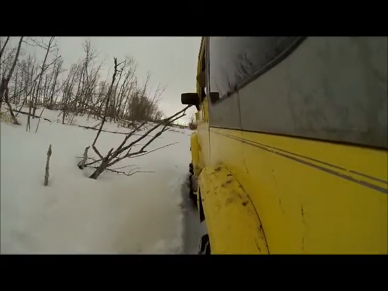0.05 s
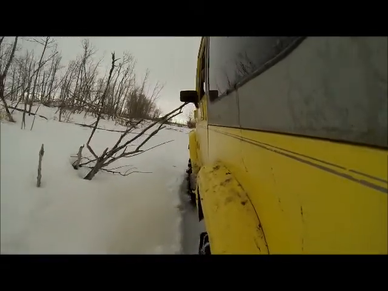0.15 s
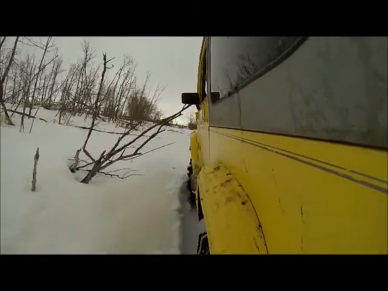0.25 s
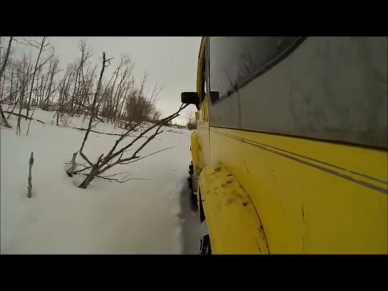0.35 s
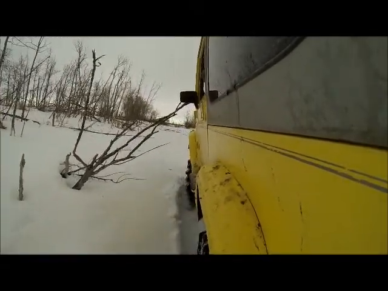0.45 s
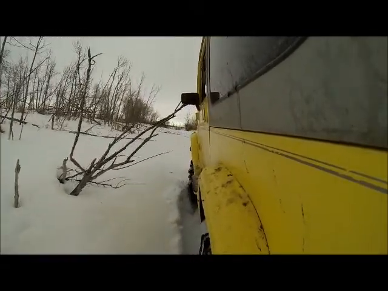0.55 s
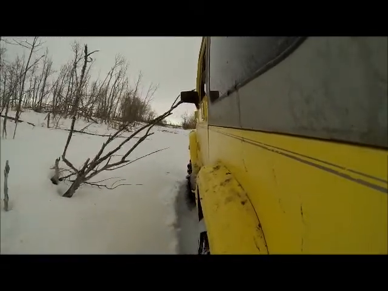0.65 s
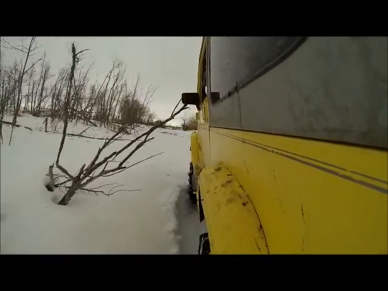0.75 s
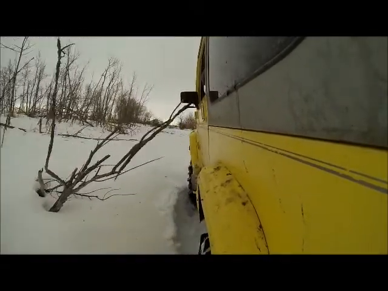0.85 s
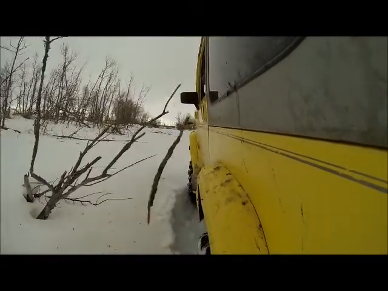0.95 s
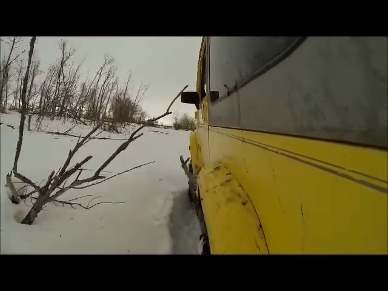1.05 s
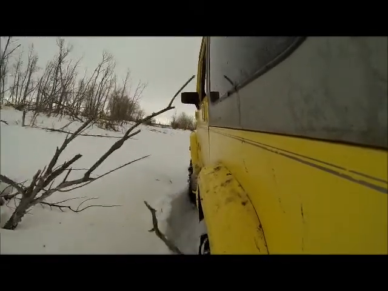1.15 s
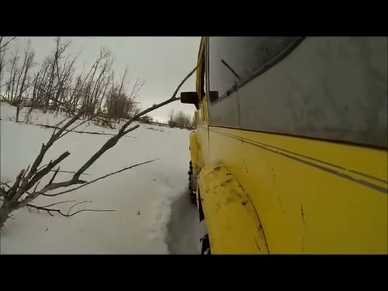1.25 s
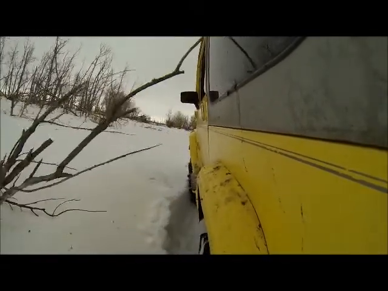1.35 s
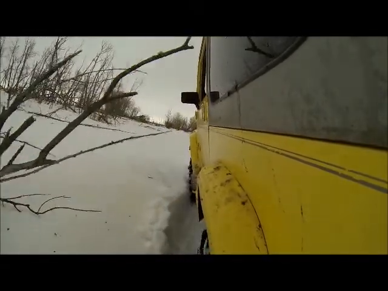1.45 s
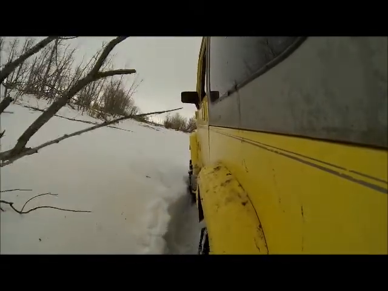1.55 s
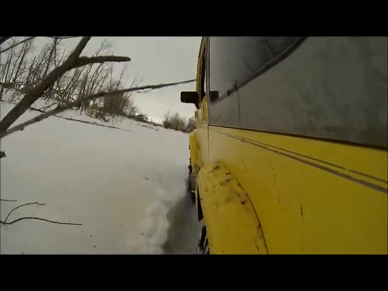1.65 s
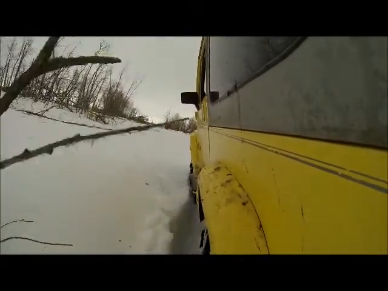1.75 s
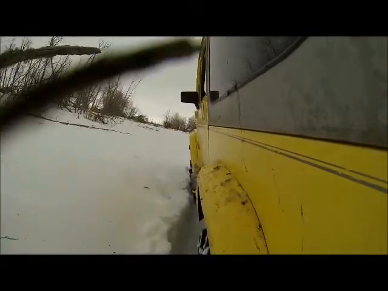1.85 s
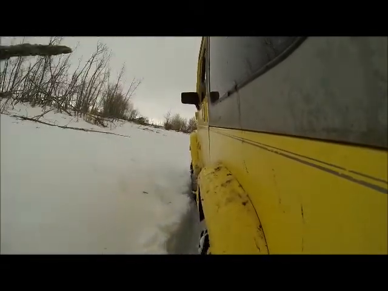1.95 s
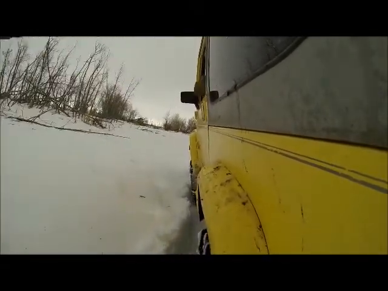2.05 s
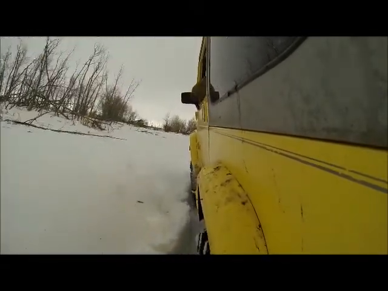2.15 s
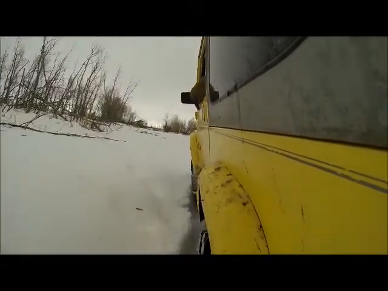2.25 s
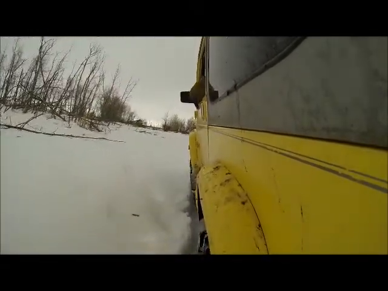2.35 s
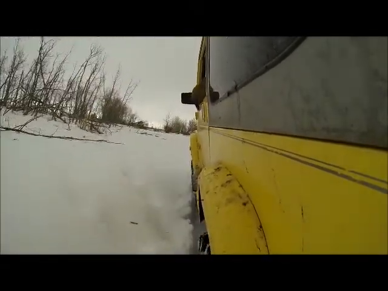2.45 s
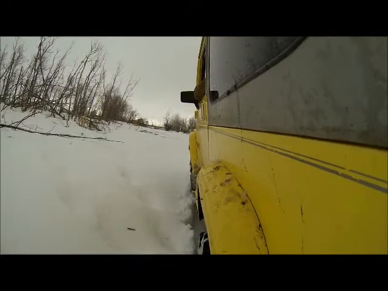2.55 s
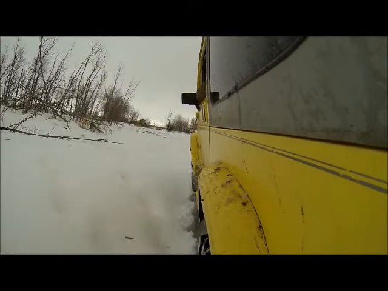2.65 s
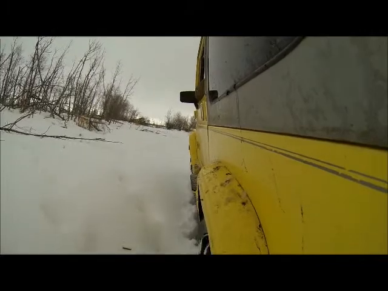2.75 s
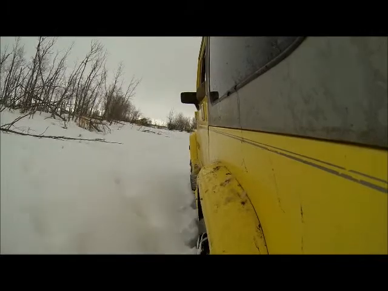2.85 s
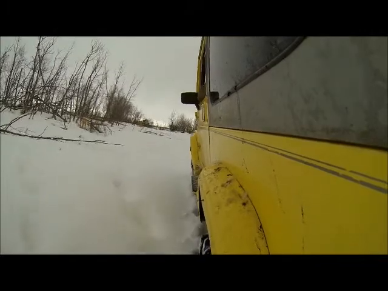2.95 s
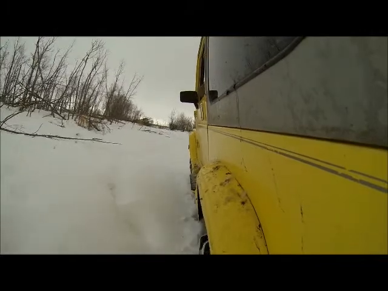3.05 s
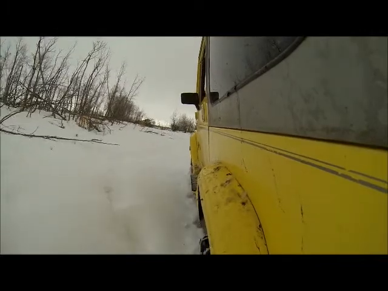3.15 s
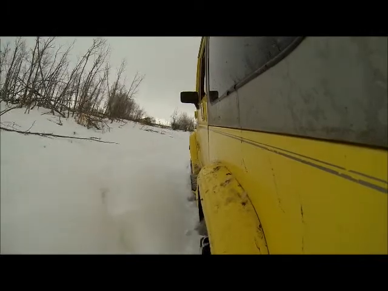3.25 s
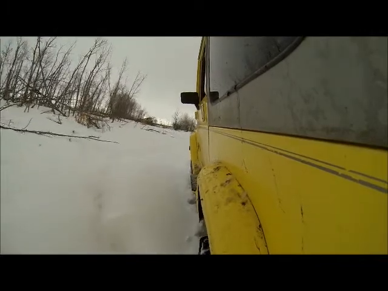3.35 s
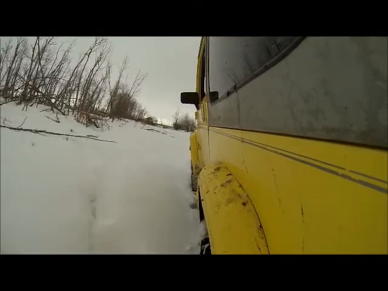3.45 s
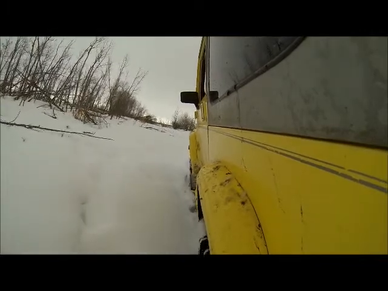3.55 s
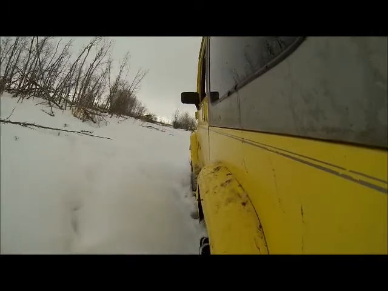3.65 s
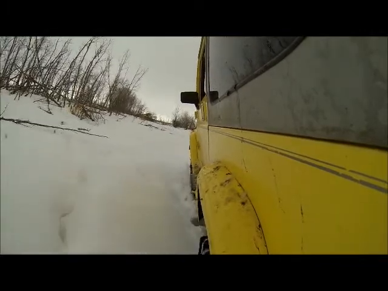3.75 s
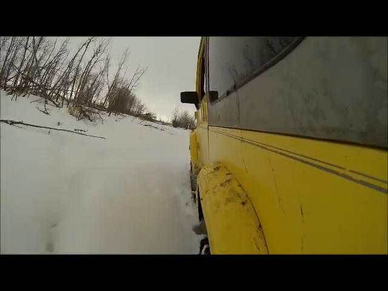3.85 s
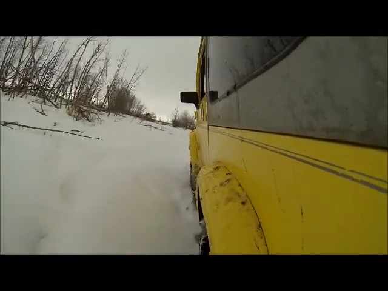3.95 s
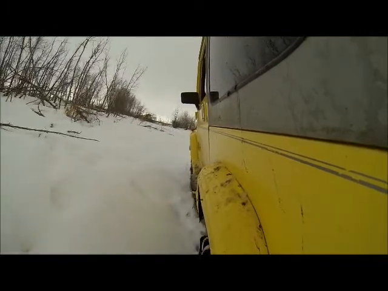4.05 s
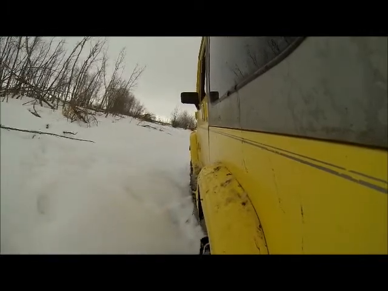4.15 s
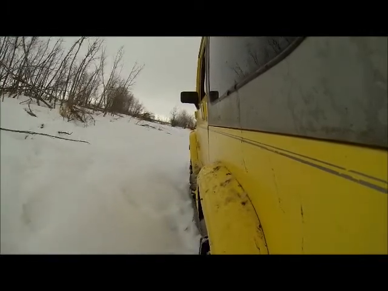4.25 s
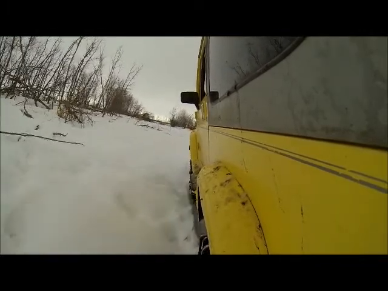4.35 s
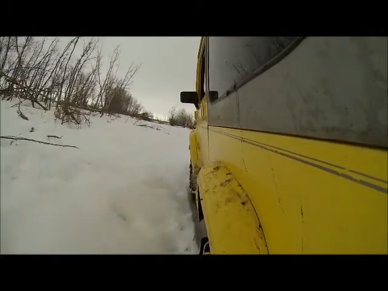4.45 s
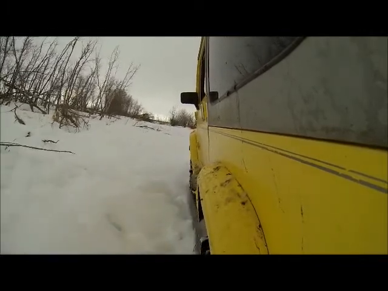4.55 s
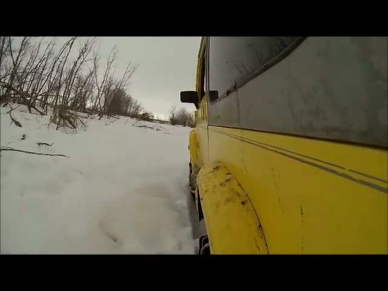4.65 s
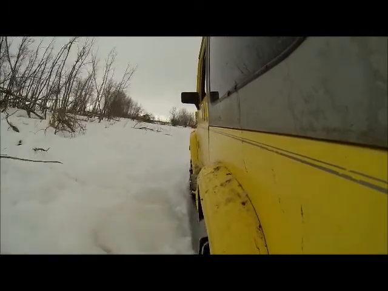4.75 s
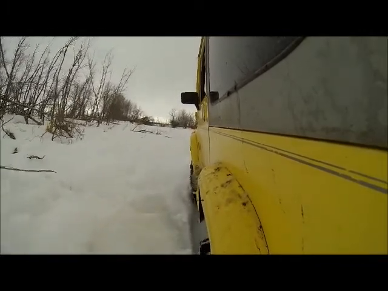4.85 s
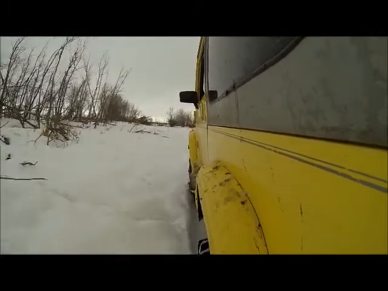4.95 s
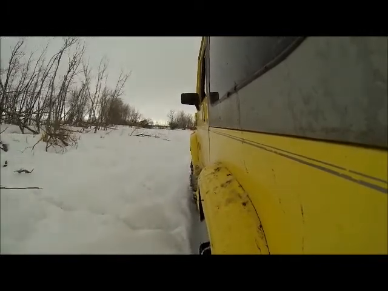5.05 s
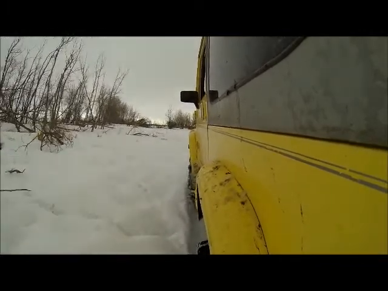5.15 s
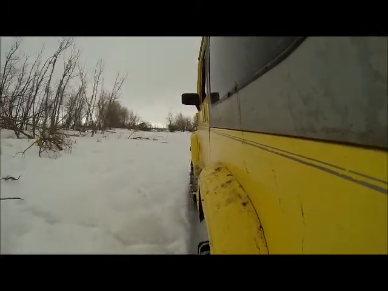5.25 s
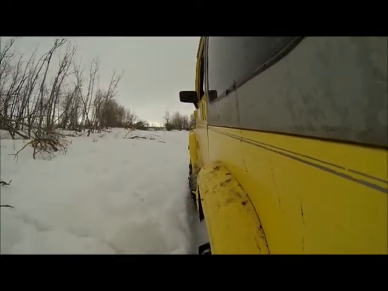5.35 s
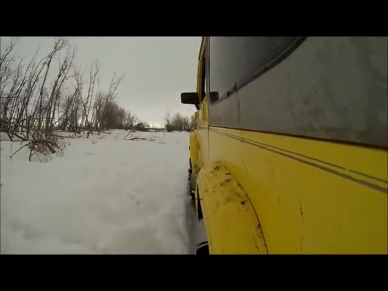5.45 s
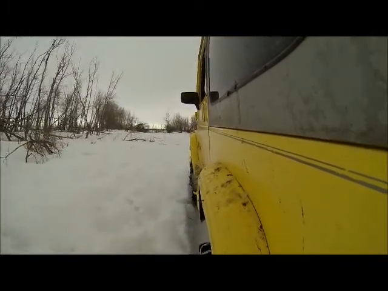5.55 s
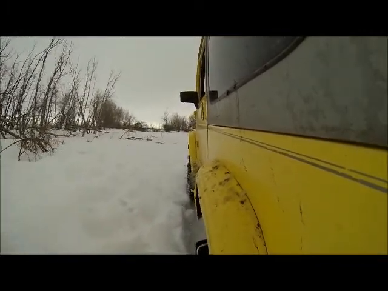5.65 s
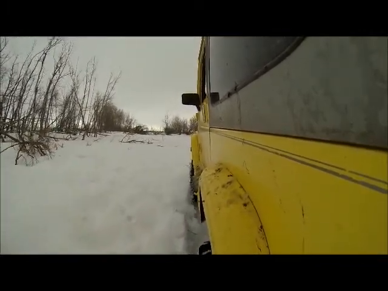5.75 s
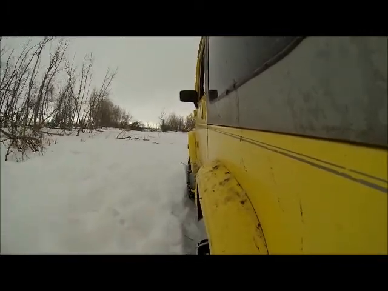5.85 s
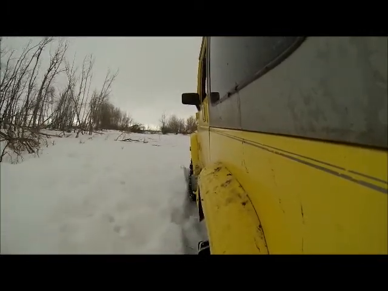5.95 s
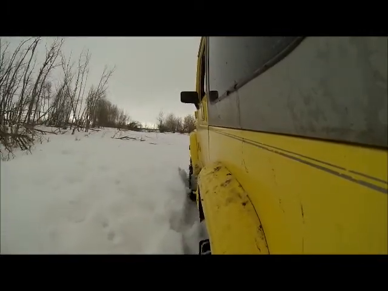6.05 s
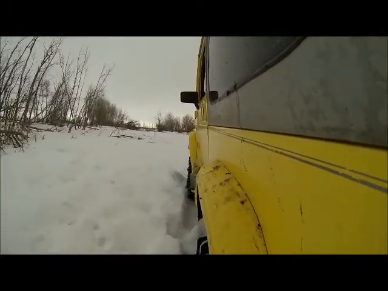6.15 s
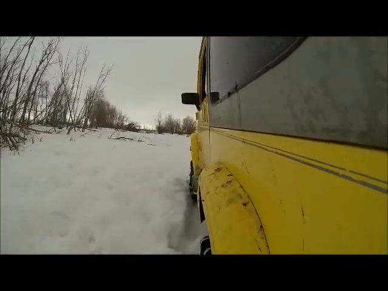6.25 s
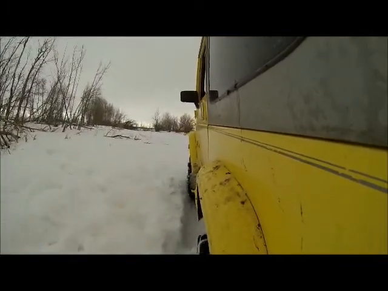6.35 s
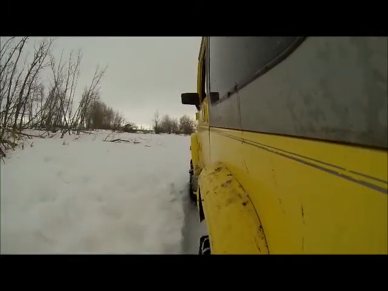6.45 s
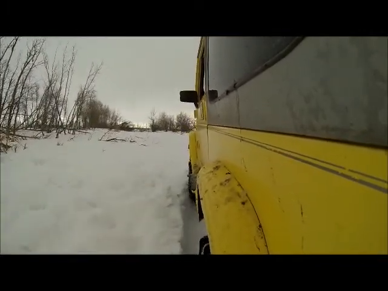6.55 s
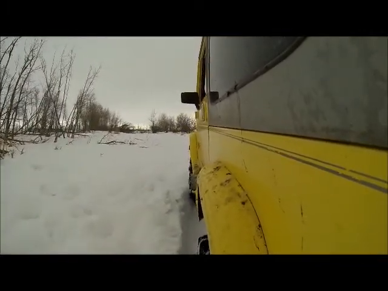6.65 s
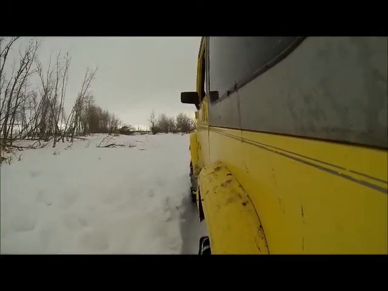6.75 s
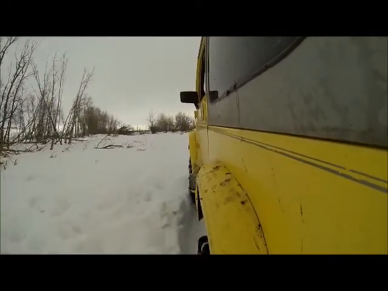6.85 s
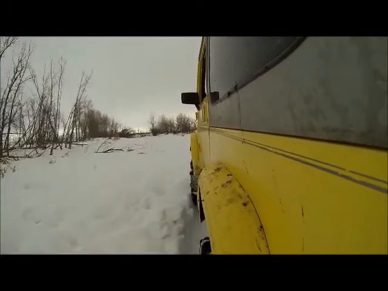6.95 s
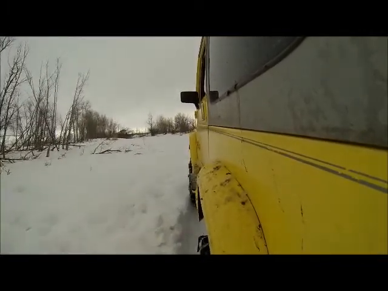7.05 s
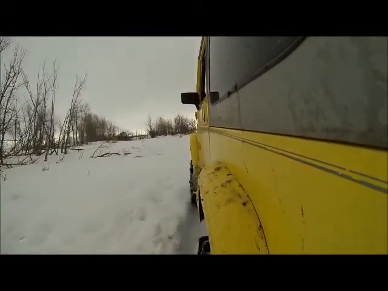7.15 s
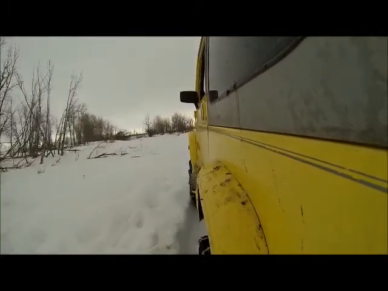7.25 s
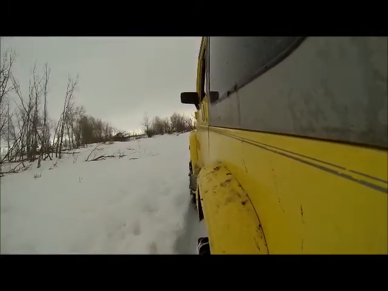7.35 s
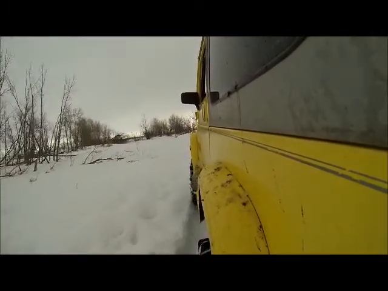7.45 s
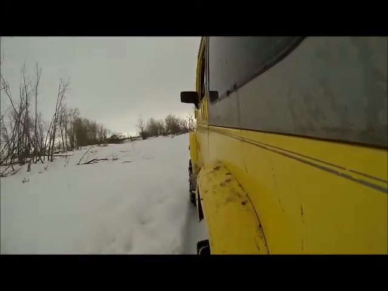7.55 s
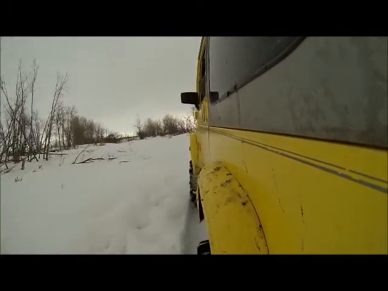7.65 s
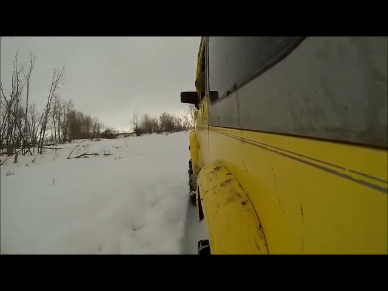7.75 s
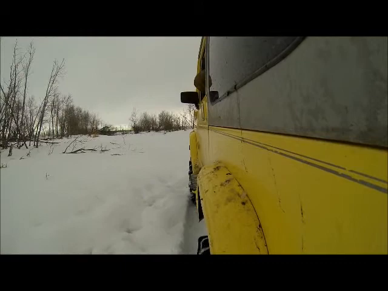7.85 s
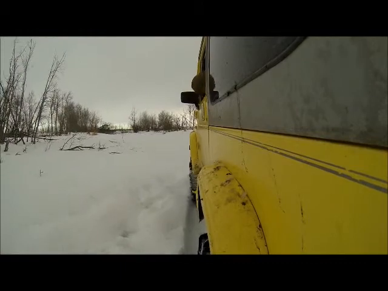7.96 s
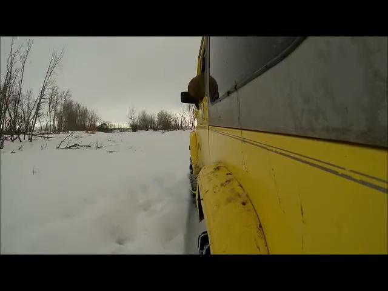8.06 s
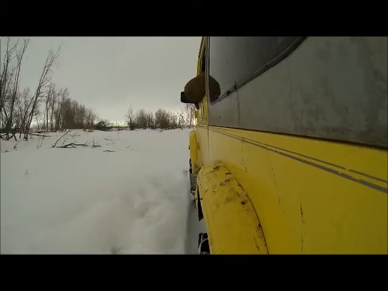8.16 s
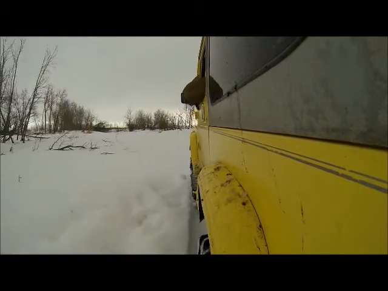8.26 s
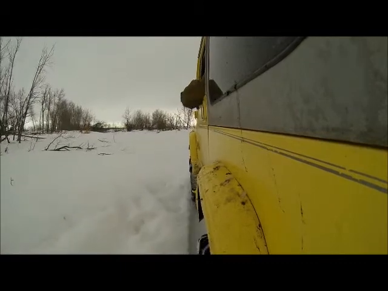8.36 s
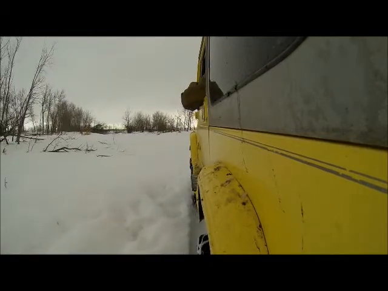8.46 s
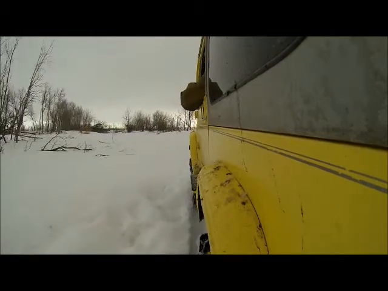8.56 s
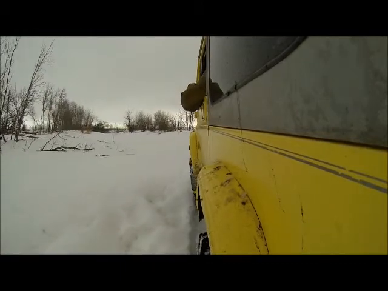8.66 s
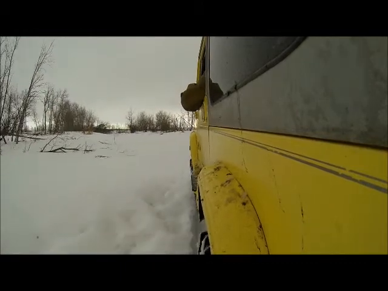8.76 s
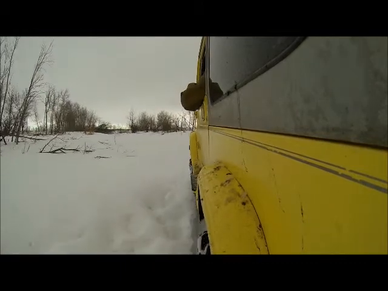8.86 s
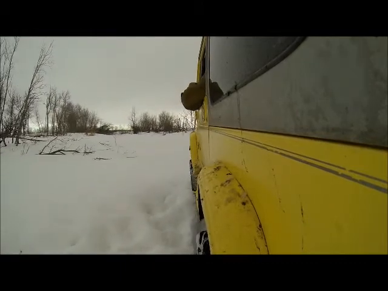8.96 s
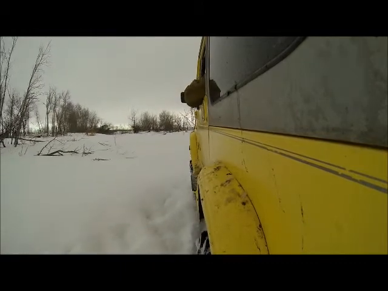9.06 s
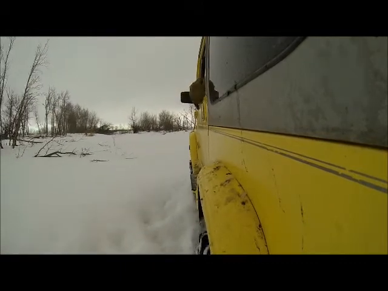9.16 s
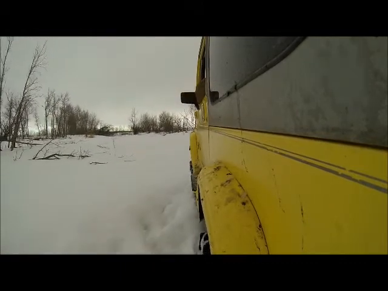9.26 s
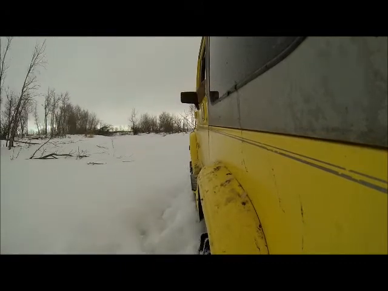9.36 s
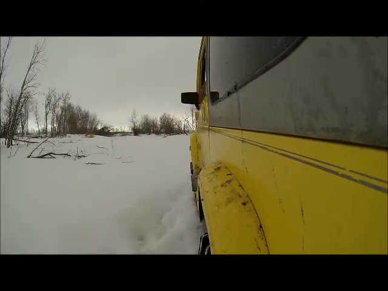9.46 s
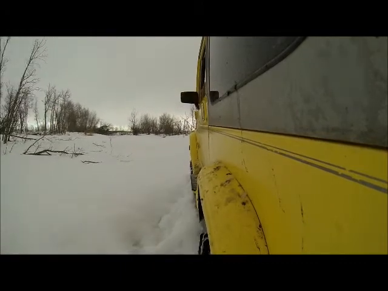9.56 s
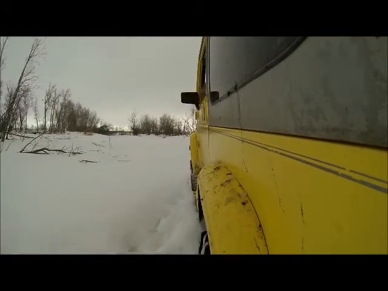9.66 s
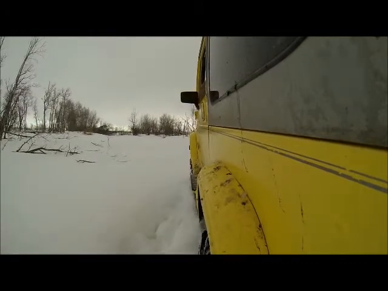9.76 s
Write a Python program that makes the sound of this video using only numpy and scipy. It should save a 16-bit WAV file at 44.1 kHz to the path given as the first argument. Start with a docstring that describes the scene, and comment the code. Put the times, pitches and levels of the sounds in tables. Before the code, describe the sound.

Dry branches crack against an off-road vehicle as its engine labours through deep snow with a low, booming drone.

```python
"""A six-cylinder off-roader picks up from idle and ploughs through deep snow, heard from its side.
Each firing of a cylinder sends a puff down the exhaust pipe, which booms; now and then one misfires.
The engine makes the bay around it ring, its small metal parts clatter, and the alternator whines.
Snow crunches under the tyres, and dry branches snap, brush past and knock against the body."""
import sys
import numpy as np
from scipy import signal
from scipy.fft import rfft, irfft, next_fast_len
from scipy.io import wavfile
from scipy.ndimage import uniform_filter1d

SR = 44100
rng = np.random.default_rng(int(sys.argv[2]) if len(sys.argv) > 2 else 0)


def digitize_waveform(pressure):
    """Quantize a signal to 16-bit integers and store it at the path in sys.argv[1].

    Rows of a 2-D input are taken as channels; values are limited to [-1, 1].
    """
    field = np.atleast_2d(pressure).T
    bounded = np.clip(field, -1, 1)
    quanta = np.round(bounded * 32767).astype(np.int16)
    wavfile.write(sys.argv[1], SR, quanta)


N = 433062
T = np.arange(N) / SR

# engine speed, with three firings per turn of the crank: (time [s], firing rate [Hz])
FIRING_RATE = [(0.0, 41.15), (0.218, 30.73), (0.512, 28.76), (0.815, 52.8), (1.115, 48.32), (1.412, 57.72),
               (1.693, 52.13), (2.5, 59.5), (3.0, 65.5), (3.38, 68.4), (4.0, 65.8), (4.22, 61.2),
               (4.75, 63), (5.0, 57.8), (5.7, 63.5), (6.22, 71.6), (6.62, 63.5), (6.96, 62.3), (7.7, 65.8),
               (7.95, 68.1), (8.16, 68.2), (8.26, 61), (8.65, 55.6), (8.92, 60), (9.57, 62.3), (9.82, 68.5)]
# a blip to pull away, a long push, then a sudden lift: (time [s], throttle opening [0-1])
THROTTLE = [(0, 0.78), (.45, 0.93), (.72, 0.8), (.95, 0.19), (1.6, 0.42), (2.45, 0.16), (2.9, 0.39),
            (5.15, 0.47), (5.95, 0.6), (6.35, 0.52), (7.5, 0.72), (8.15, 0.55), (8.19, 0.4), (8.53, 0.38),
            (8.7, 0.4), (9.82, 0.35)]
# how unevenly the cylinders fire: (time [s], spread in strength [dB])
UNEVENNESS = [(0, 1.3), (.55, .4), (2.4, .45), (3.2, .8), (8.15, .8), (8.2, 2.3), (8.9, 1.8)]
# weak firings: (time [s], change in strength [dB])
MISFIRES = [(.092, -11.5), (.118, -22), (.147, -6.5), (.21, -15.5), (3.914, -11.5), (4.81, -22),
            (6.372, -8), (6.923, -16.5), (7.701, -10), (8.175, -13), (8.229, -11.5), (8.5, -14),
            (9.048, -8.5)]
# tone of the exhaust pipe: (frequency [Hz], level [dB])
PIPE_SPECTRUM = [(14, -31.5), (28, -5), (42, 0), (56, -2.5), (72, -6), (100, -14), (135, -20.5), (170, -39),
                 (300, -49.5), (500, -68)]
# how loudly the pipe booms: (time [s], level [dB])
BOOM_LEVEL = [(0, -13), (.44, -11.5), (.74, -8.5), (1.2, -17), (1.91, -7.5), (2.22, -12.5), (3.0, -9),
              (4.5, -8), (8.1, -9.5), (9.82, -11.5)]
# bark, the upper part of the boom: (time [s], boost [dB])
BARK_BOOST = [(.45, -7), (.8, -2), (1.25, 4.5), (1.85, 1), (2.8, -0.5), (4.6, -2), (6, 0)]
# rumble of uneven firing: (frequency [Hz], level [dB])
RUMBLE_SPECTRUM = [(10, -16.5), (20, -3), (45, -4.5), (75, -7.5), (120, -16.5), (400, -36)]
# low tones of the pipe: (order [cycles per crank turn], level [dB])
GROWL_TONES = [(9, -2), (10, -6)]
# higher tones of the pipe: (order [cycles per crank turn], level [dB])
HUM_TONES = [(12, -6), (15, -6), (18, -11), (21, -16), (24, -11.5)]
# the cylinders as they take turns: (strength [dB], lateness [share of the time between firings])
CYLINDERS = [(-4, -0.013), (-3, 0.027), (-6.5, -0.017), (-4, 0.026), (-3, .03), (-1, -.02)]
# tones that shake the engine bay: (order [cycles per crank turn], level [dB])
RASP_TONES = [(29, 2.5), (30, 2), (31, -0.5), (33, 2.5), (34, 0), (36, -0.5)]
# where the engine bay and body ring: (frequency [Hz], width [Hz], level [dB])
BAY_RESONANCES = [(385, 73, -8), (620, 39, -9.5), (671, 46.4, 11), (704, 41, 1), (741.6, 167, 10.5),
                  (877, 47, -6.5)]
# how loudly the bay rings as the load changes: (time [s], level [dB])
BAY_LEVEL = [(0, -30.5), (.25, -32.5), (.45, -40), (.75, -31), (1.0, -36.5), (2.76, -36), (2.88, -31.5),
             (3.55, -29.5), (4.05, -32), (4.6, -34.5), (5.4, -32.5), (5.97, -28), (6.58, -32), (6.78, -30),
             (7.2, -30), (8.16, -25.5), (8.2, -32.5), (8.38, -30), (8.53, -32.5), (9.5, -35), (9.75, -30)]
# tone of the engine's clatter, with the microphone's treble peaks and dips: (frequency [Hz], level [dB])
CLATTER_SPECTRUM = [(560, -26), (950, -0.5), (983, -6.5), (1050, -6), (1440, -11), (1670, -5),
                    (2370, -13.5), (2810, -12.5), (3380, -16.5), (4570, -32.5), (5250, -27), (6530, -38),
                    (8420, -33.5), (10900, -38.5), (15000, -48.5)]
# tone of the icy grains: (frequency [Hz], level [dB])
SNOW_SPECTRUM = [(400, -19.5), (1200, 2.5), (3200, 14.5), (4500, -14), (8500, -31.5), (15000, -25.5)]
# sticks breaking: (time [s], level [dB], low edge [Hz], high edge [Hz], ring [Hz], splintering time [s])
SNAPS = [(0.2694, -2, 1400, 12000, 3600, 0.0028), (0.2749, -5, 700, 10000, 3900, 0.0035),
         (0.2832, -12.5, 1300, 8000, 3400, 0.0053), (0.3079, -11.5, 600, 13000, 3600, 0.0042),
         (0.5172, -29.5, 1200, 8000, 3180, 0.0042), (0.7706, -16, 500, 6600, 1790, 0.0056),
         (1.1192, -28.5, 202, 2190, 1650, 0.004), (1.153, -21.5, 200, 1980, 1510, 0.0043),
         (1.163, -14, 300, 4000, 1960, 0.0073), (1.194, -27, 198, 4580, 640, 0.008),
         (1.4446, -21.5, 298, 2980, 2630, 0.0058), (1.923, -26, 200, 3440, 1900, 0.013),
         (1.988, -28, 1100, 4540, 2570, 0.016), (2.0208, -20, 1480, 9000, 2600, 0.0024),
         (2.0405, -8, 2000, 9000, 3180, 0.0027), (2.0678, -9, 1600, 8960, 3800, 0.0049),
         (2.0805, -17, 700, 6960, 3200, 0.0059), (2.087, -22, 297, 2570, 1800, 0.0054),
         (2.116, -25, 500, 6000, 2000, 0.013), (2.127, -14.5, 500, 6000, 2960, 0.012),
         (2.1351, -15.5, 460, 5030, 1900, 0.0096), (6.881, -18, 220, 5500, 2600, 0.0078),
         (6.978, -21, 300, 4500, 2500, 0.01)]
# tone of every snap as heard through the camera's housing and microphone: (frequency [Hz], level [dB])
SNAP_SPECTRUM = [(200, -1), (500, 11), (900, 6), (1300, -4.5), (1850, 0), (2400, -8), (3400, -5.5),
                 (4400, -14), (5500, -15), (7000, -21), (9000, -17), (15000, -24)]
# twigs and snow sliding past: (time [s], fade time [s], level [dB], pitch [Hz])
BRUSHES = [(0.307, 0.035, -43, 6400), (0.795, 0.033, -46, 3600), (1.329, 0.018, -52, 4400),
           (1.63, 0.1, -60, 4930), (2.789, 0.062, -50, 3400), (2.795, 0.045, -56, 8300),
           (7.02, 0.13, -51, 2600), (9.6, 0.073, -63.5, 6500)]
# big lumps of snow crust being crushed: (time [s], level [dB], pitch [Hz])
CRUNCHES = [(0.602, -38, 2070), (0.85, -37, 2600), (2.467, -51, 3800), (2.545, -50, 3900),
            (2.645, -52, 4100), (5.517, -36.5, 2080), (5.582, -42.5, 2770), (7.952, -40.5, 2120),
            (9.742, -40, 2210)]
# branches hitting the body: (time [s], ring level [dB], pitch [Hz], time to fade 60 dB [s], thud [dB])
KNOCKS = [(1.122, -20.5, 1660, 0.036, -7), (1.1639, -4, 823, 0.032, -14), (1.27, -16.5, 1610, 0.039, -17.5),
          (1.447, -24, 2020, 0.037, -33), (2.086, -13, 813, 0.032, -32), (2.134, -15, 550, 0.066, -34),
          (6.995, -22.5, 805, 0.13, -36)]
# where the body panel rings: (frequency [Hz], width [Hz], level [dB])
PANEL_RESONANCES = [(260, 113, 4), (640, 250, -3), (910, 160, -17)]

# how sounds follow effort: (closed throttle [dB], added at full throttle [dB], per octave of speed [dB])
GAS_EFFORT, GROWL_EFFORT, HUM_EFFORT = (-38.5, 6.4, 0), (-46.5, 24.7, -9), (-42.5, 11.5, 0)
CLATTER_EFFORT = (-49, 10.3, -1.2)
RASP_EFFORT = (-23.5, 7.5, 0)  # relative to the rush of gas in the bay
LUGGING_HZ = 64.6  # below this firing rate the engine labours


def undb(db):
    """Turn decibels into a gain."""
    return 10 ** (np.asarray(db) / 20)


def unit(x):
    """Scale a sound to an average (rms) level of 1."""
    return x / np.sqrt(np.mean(x ** 2))


def curve(table):
    """Join the points of a (time, value) table, giving a value at every sample."""
    return np.interp(T, *np.transpose(table))


def colour(x, spectrum):
    """Shape a sound's tone by a (frequency, level) table, fading out beyond its ends."""
    hz, db = np.transpose(spectrum)
    size = next_fast_len(N + SR)
    f = np.fft.rfftfreq(size, 1 / SR) + 1e-9
    edges = np.minimum(f / hz[0], hz[-1] / f).clip(0, 1) ** 2
    gain = undb(np.interp(np.log(f), np.log(hz), db)) * edges
    return irfft(rfft(x, size) * gain, size)[:N]


def resonate(x, hz, width):
    """Let a sound ring around one frequency, where the gain is 1."""
    g, k = np.tan(np.pi * min(hz / SR, .45)), width / hz
    return signal.lfilter([g * k, 0, -g * k], [1 + g * k + g * g, 2 * (g * g - 1), 1 - g * k + g * g], x)


def band(x, hz, width):
    """Resonate twice, so that less gets through on either side."""
    return resonate(resonate(x, hz, width), hz, width)


def wander(rate):
    """A random drift of size about 1 that takes a new course `rate` times a second."""
    turns = np.arange(0, T[-1] + 1, 1 / rate)
    return unit(np.interp(T, turns, rng.standard_normal(len(turns))))


def steady(x, span_s):
    """Even out a sound so that its level stays near 1."""
    span = int(span_s * SR)
    return x / np.sqrt(uniform_filter1d(uniform_filter1d(x * x, span), span) + 1e-18)


def clicks(times, sizes):
    """Clicks at the given times, each shared between two samples."""
    at = np.clip(times * SR, 0, N - 2)
    i = at.astype(int)
    return np.bincount(i, sizes * (1 - at + i), N) + np.bincount(i + 1, sizes * (at - i), N)


def add(out, start, x):
    """Mix in a short sound at `start` seconds."""
    i = int(start * SR)
    out[i:i + len(x)] += x[:N - i]


def effort(law, hz):
    """Gain of an engine sound, set by the throttle and by any speed above lugging."""
    closed_db, throttle_db, octave_db = law
    octaves = np.log2(np.maximum(hz / LUGGING_HZ, 1))
    return undb(closed_db + throttle_db * curve(THROTTLE) + octave_db * octaves)


def misfire_db(firings):
    """How much weaker each firing is than a healthy one."""
    db = np.zeros(len(firings))
    for when, drop_db in MISFIRES:
        db[np.argmin(abs(firings - when))] = drop_db
    return db


def crank_tones(phase, tones):
    """Tones that follow the turning crank, each wavering a little in pitch and level."""
    out = np.zeros(N)
    for order, db in tones:
        angle = 2 * np.pi * (order * phase / 3 + rng.random()) + .011 * order * wander(14)
        out += undb(db) * np.sqrt(2) * np.sin(angle) * (1 + .22 * wander(30))
    return out


def exhaust(firings, hz, bark_hz=90.5):
    """Each firing booms in the pipe; gas roars through it and rumbles when firing is uneven."""
    spread_db = curve(UNEVENNESS)
    puff_db = np.interp(firings, T, spread_db) * rng.standard_normal(len(firings)) + misfire_db(firings)
    puffs = colour(clicks(firings, undb(puff_db)), PIPE_SPECTRUM)
    boom = steady(puffs, span_s=0.54) * undb(curve(BOOM_LEVEL))
    bark = signal.sosfiltfilt(signal.butter(4, bark_hz, "high", fs=SR, output="sos"), boom)
    boom += bark * (undb(curve(BARK_BOOST)) - 1)
    rumble = unit(colour(rng.standard_normal(N), RUMBLE_SPECTRUM)) * spread_db * undb(-23 + wander(15))
    gas = unit(band(rng.standard_normal(N), hz=262, width=340))
    return boom + rumble + gas * effort(GAS_EFFORT, hz)


def pipe_drone(hz, phase):
    """Low tones growl at wide throttle; higher ones hum, most where the silencer rings."""
    growl = crank_tones(phase, GROWL_TONES)
    hum = crank_tones(phase, HUM_TONES)
    silencer = undb(4.5) * resonate(hum, hz=321, width=57)
    return growl * effort(GROWL_EFFORT, hz) + (hum + silencer) * effort(HUM_EFFORT, hz)


def engine_bay(firings, hz, phase, throb_depth=0.25, misfire_share=0.89):
    """Unequal cylinders knock, gas rushes and the crank rasps; all three make the bay ring."""
    strength_db, late = np.array(CYLINDERS)[np.arange(len(firings)) % len(CYLINDERS)].T
    time_jitter, level_jitter = rng.standard_normal((len(firings), 2)).T
    knock_times = firings + (0.304 + late) / np.interp(firings, T, hz) + .00007 * time_jitter
    knocks = clicks(knock_times, undb(strength_db + 0.8 * level_jitter))
    rush = rng.standard_normal(N) * (1 + 0.7 * np.cos(4 * np.pi * (phase - .3)))  # twice per firing
    rush *= 1 + throb_depth * np.cos(2 * np.pi * phase / 3)  # swells once per crank turn
    rasp = colour(crank_tones(phase, RASP_TONES), [(560, -19.5), (650, 0.5), (900, 1.5)])
    shaking = 0.44 * unit(knocks) + unit(rush) + effort(RASP_EFFORT, hz) * unit(rasp)
    ring = sum(undb(db) * band(shaking, f, width) for f, width, db in BAY_RESONANCES)
    dip_db = misfire_share * np.interp(T, firings, misfire_db(firings))
    return steady(ring, span_s=0.16) * undb(curve(BAY_LEVEL) + dip_db)


def valve_clatter(hz, phase, burst_s=.007, ring_s=.005):
    """Valves and blowing gas make a gritty burst after each firing, ringing small metal parts."""
    since_firing = phase % 1 / hz
    between_bursts = .5 * np.minimum(hz / LUGGING_HZ, 1) ** 2  # slow firings stand apart
    bursts = np.exp(-since_firing / burst_s) * undb(2 * wander(50))
    grit = rng.standard_normal(N) * (bursts + between_bursts)
    t = T[:SR // 12]
    ring = signal.fftconvolve(grit, rng.standard_normal(len(t)) * np.exp(-t / ring_s))[:N]
    clatter = colour(unit(grit) + .35 * unit(ring), CLATTER_SPECTRUM)
    return unit(clatter) * effort(CLATTER_EFFORT, hz) * undb(wander(16))


def alternator(phase, cycles_per_firing=17.35):
    """A thin whine that follows the engine speed, loudest where its housing rings."""
    angle = 2 * np.pi * cycles_per_firing * phase + .6 * wander(25)
    low = resonate(np.sin(angle), hz=1033, width=34) * undb(-43)
    high = resonate(np.sin(angle * 3 / 2), hz=1680, width=160) * undb(-52)
    return (low + high) * undb(2 * wander(14))


def snow_grains(count=5000):
    """The snow's crust caves in under the tyres as small, icy grains that ring briefly."""
    times = rng.uniform(0, T[-1], count)
    sizes = undb(3.2 * rng.exponential(size=count).clip(0, 3.5))
    grains = clicks(times, rng.standard_normal(count) * sizes)
    grains += undb(8.5) * resonate(grains, hz=3260, width=270)
    return unit(colour(grains, SNOW_SPECTRUM)) * undb(-60.5 + 1.9 * wander(8.2))


def stick_snaps(fibres_per_s=900, crack_s=.0008, echo_s=.04, echo_db=-35.5):
    """One wood fibre gives way, then its neighbours, in a quick run of dry cracks."""
    out, t = np.zeros(N), T[:SR // 4]
    dull = signal.butter(1, 5500, fs=SR, output="sos")
    for start, db, low_hz, high_hz, ring_hz, splinter_s in SNAPS:
        fibres = (rng.random(len(t)) < fibres_per_s / SR) * np.exp(-t / splinter_s)
        fibres[0] = 0.96  # the first break
        powers = (signal.fftconvolve(fibres ** 2, np.exp(-2 * t / fade)) for fade in (crack_s, echo_s))
        crack, echo = (rng.standard_normal(len(t)) * np.sqrt(abs(power[:len(t)])) for power in powers)
        snap = crack + undb(echo_db) * signal.sosfilt(dull, echo)  # echo off the body and the trees
        snap = signal.sosfilt(signal.butter(2, high_hz, fs=SR, output="sos"), snap)
        snap = signal.sosfilt(signal.butter(1, low_hz, "high", fs=SR, output="sos"), snap)
        snap += undb(7.5) * resonate(snap, ring_hz, width=0.35 * ring_hz)  # the stick rings
        add(out, start, undb(db) * snap / np.sqrt(np.sum(snap ** 2) / (splinter_s * SR)))
    return colour(out, SNAP_SPECTRUM)


def twig_brushes():
    """Twigs and snow scrape along the body, each in a hiss that swells and fades."""
    out = np.zeros(N)
    scrape = rng.standard_normal(N) * undb(1.8 * wander(300))
    for when, fade_s, db, hz in BRUSHES:
        swell = np.exp(-np.minimum(((T - when) / fade_s) ** 2, 20))
        out += undb(db) * swell * unit(band(scrape, hz, width=1.1 * hz))
    return out


def snow_crunches(rise_s=0.0087, grains_per_s=1100, crumb_db=-51.5, crumb_hz=3020):
    """Big lumps of crust, and smaller crumbs at random times, give way in short swells of grit."""
    out, t = np.zeros(N), T[:SR // 12]
    crumbs = [(when * T[-1], crumb_db - 4.5 * softness, crumb_hz * 2 ** ((pitch - .5) / 2))
              for when, softness, pitch in rng.random(size=(45, 3))]
    swell = (t / rise_s) ** 2 * np.exp(2 - 2 * t / rise_s)
    for when, db, hz in CRUNCHES + crumbs:
        grains = (rng.random(len(t)) < grains_per_s / SR) * rng.standard_normal(len(t))
        add(out, max(when - rise_s, 0), undb(db) * swell * unit(band(grains, hz, width=0.53 * hz)))
    return out


def branch_knocks(rise_s=.0012, rattle_db=3, thud_fade_s=0.088):
    """A branch rings as it knocks and rattles on a body panel, which thuds."""
    out, t = np.zeros(N), T[:SR // 4]
    contact = 1 - np.exp(-t / rise_s)
    for start, db, hz, fade_s, thud_db in KNOCKS:
        rattle = rng.standard_normal(len(t)) * undb(rattle_db * wander(250)[:len(t)])
        rough_ring = unit(band(rattle, hz, width=0.25 * hz))
        ring = undb(db - 60 * t / fade_s) * (1.3 * np.sin(2 * np.pi * hz * t) + .5 * rough_ring)
        panel = sum(undb(level) * band(rattle, f, width) for f, width, level in PANEL_RESONANCES)
        thud = undb(thud_db - 60 * t / thud_fade_s) * unit(panel)
        add(out, start, contact * (ring + thud))
    return out


def scene():
    """The crank times everything the engine does; snow and wood come on top."""
    hz = curve(FIRING_RATE)
    phase = np.cumsum(hz) / SR - .56  # goes up by 1 with each firing
    firings = np.interp(np.arange(int(phase[-1]) + 1), phase, T)  # their times in seconds
    motor = exhaust(firings, hz) + pipe_drone(hz, phase) + engine_bay(firings, hz, phase)
    motor += valve_clatter(hz, phase) + alternator(phase)
    return (motor + snow_grains() + snow_crunches() + stick_snaps() + branch_knocks() + twig_brushes())[None]


def record(dry):
    """The camera on the vehicle's side rounds off the loudest peaks and cuts the highest treble."""
    ceiling, top_hz = .9, 15700
    rounded = dry / (1 + (dry / ceiling) ** 8) ** (1 / 8)
    return signal.sosfilt(signal.ellip(8, .2, 70, top_hz, fs=SR, output="sos"), rounded)


dry = scene()
out = record(dry)
digitize_waveform(out)
```